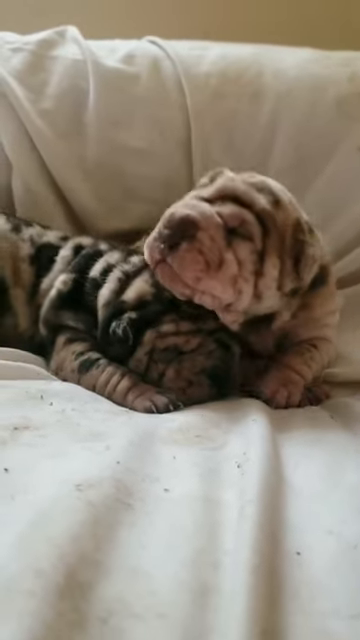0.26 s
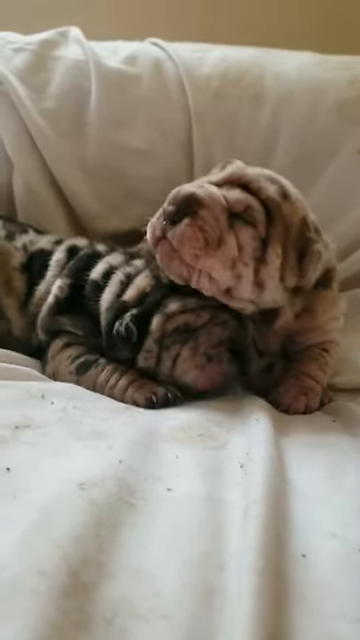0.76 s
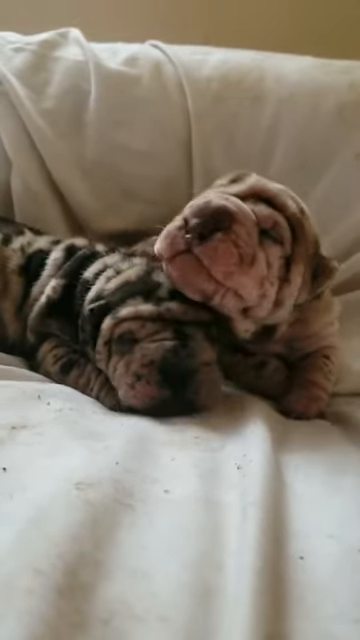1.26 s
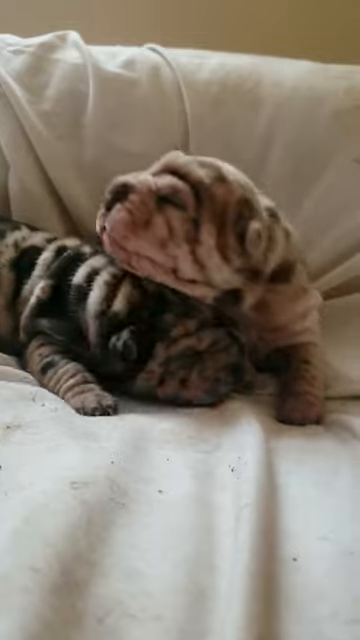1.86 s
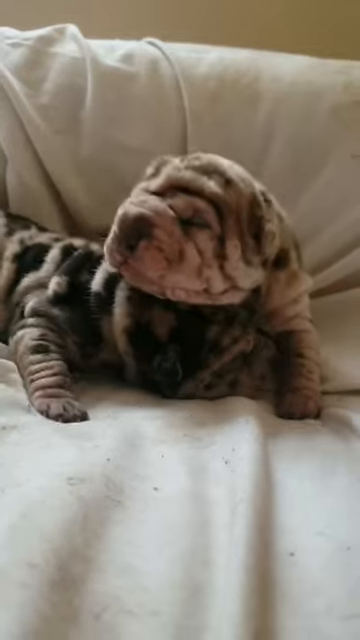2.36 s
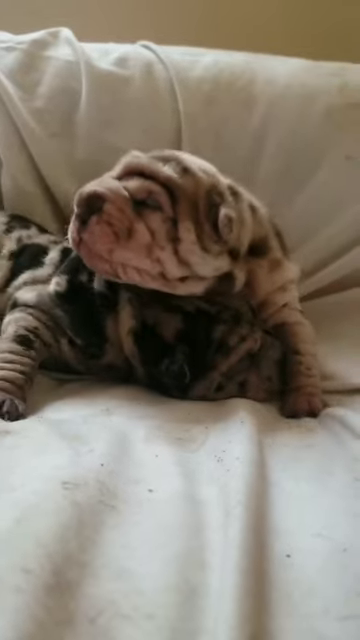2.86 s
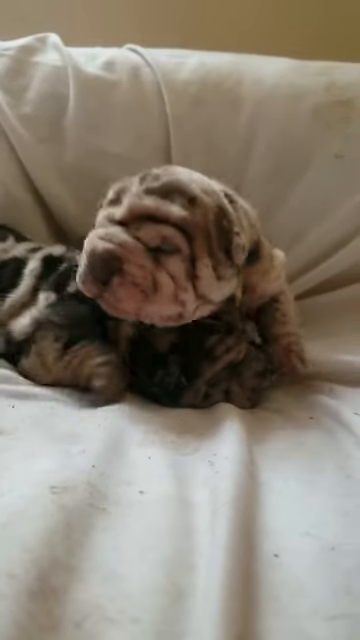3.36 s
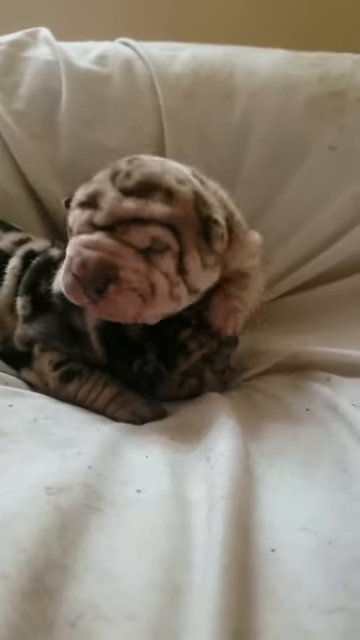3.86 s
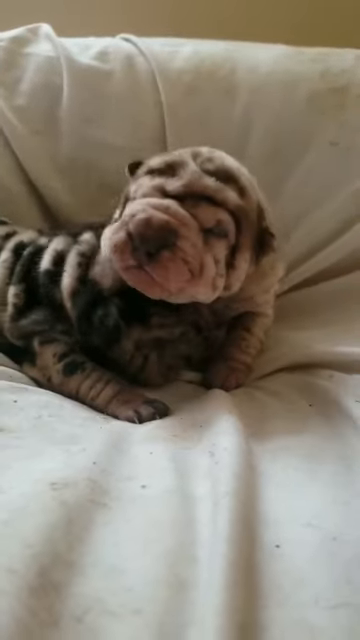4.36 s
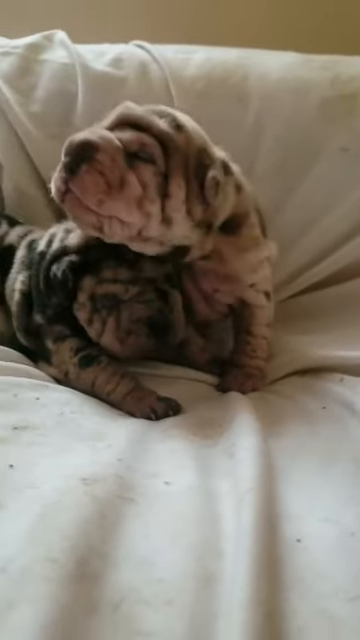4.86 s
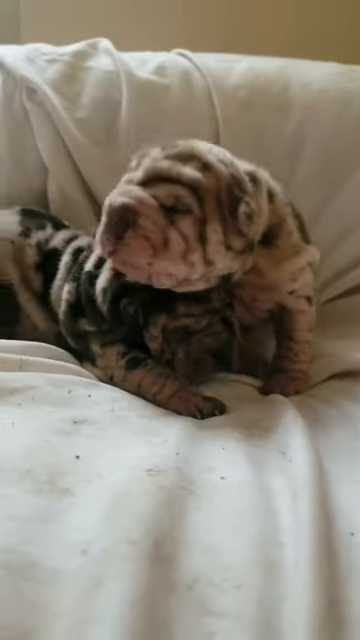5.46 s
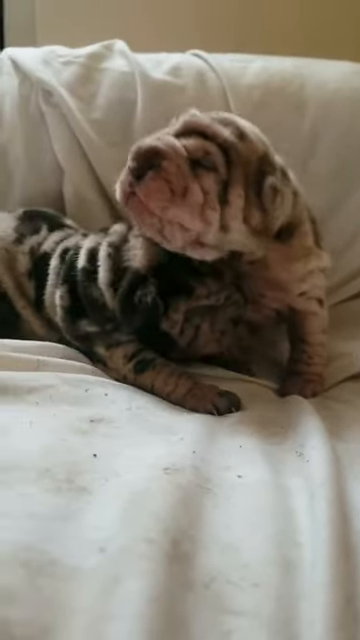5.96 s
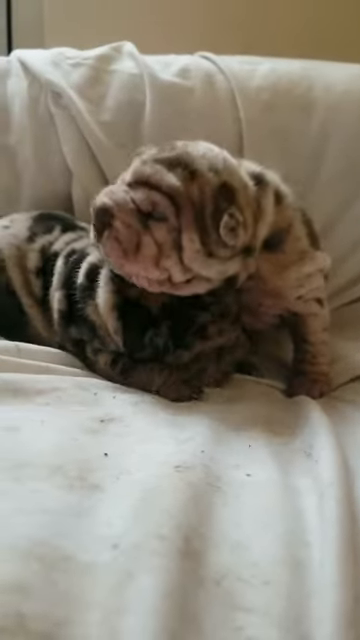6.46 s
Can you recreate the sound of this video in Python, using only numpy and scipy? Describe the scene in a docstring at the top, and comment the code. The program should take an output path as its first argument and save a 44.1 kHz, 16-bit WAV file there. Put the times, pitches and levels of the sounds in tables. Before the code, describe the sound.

Close up in a bare room, a tiny pup gives repeated squeaky yips breaking into low grumbles, between small grunts, faint bumps and cloth rubbing.

```python
"""A very young puppy cries again and again: each cry leaps to a yip, breaks and sinks to a grumble.
Creaky grunts, a whine and a squeak share its voice: pulses of the vocal folds excite the throat,
mouth and muzzle resonances, with hiss added. Two puppies wriggle on a sofa in a bare room: bumps are
damped resonances, cloth and fur rubbing the right port is shaped noise, and room tone lies beneath."""
import sys
import numpy as np
from scipy import signal
from scipy.fft import rfft, irfft, next_fast_len
from scipy.io import wavfile
from scipy.ndimage import uniform_filter1d

SR = 44100
rng = np.random.default_rng(int(sys.argv[2]) if len(sys.argv) > 2 else 0)


def dump_mix(stems):
    """Bounce the given channels to the path in sys.argv[1] as a 16-bit WAV at rate SR."""
    frames = np.atleast_2d(stems).T  # one column per channel
    limited = np.clip(frames, -1, 1)  # hard clip at full scale
    pcm = np.round(limited * 32767).astype(np.int16)
    wavfile.write(sys.argv[1], SR, pcm)


N = 296793
T = np.arange(N) / SR  # time axis in s

# Spectrum of the room tone. Each row: frequency in Hz, relative level in dB per Hz.
HUSH_SPECTRUM = [(25, -19), (70, 0), (130, -5), (300, -29.5), (4000, -33), (12500, -37.5)]
HUSH_DB = -66  # rms before its slow swell

# Reverberation time of the room. Each row: frequency in Hz, time to fall by 60 dB in seconds.
ROOM_DECAY = [(300, 0.69), (12000, 0.34)]
# Tint of the reflections. Each row: frequency in Hz, gain in dB.
ROOM_TINT = [(300, -1), (900, 0.5), (1800, 4.5)]

# Soft bumps of paws and bodies. Each row: start in seconds, envelope peak in dB.
BODY_BUMPS = [(.186, -40.5), (1.002, -40.5), (1.1, -51), (4.298, -48), (4.716, -49.5), (5.362, -42.5)]

# Spectrum of cloth and fur rubbing. Each row: frequency in Hz, relative level in dB per Hz.
RUB_SPECTRUM = [(40, -14.5), (140, 4), (500, -4), (1400, -11.5), (4000, -13), (9500, -19.5), (12500, -17.5)]
# Strokes of cloth and fur. Each row: start in seconds, time of most pressure in seconds,
# end in seconds, peak in dB, level it eases towards in dB.
RUB_STROKES = [(0.344, 0.381, 0.59, -52, -61), (2.695, 2.725, 2.81, -57.5, -106),
               (4.767, 4.916, 5.76, -39, -86), (5.12, 5.26, 5.35, -55, -45),
               (6.193, 6.37, 6.49, -52.5, -76)]
RUB_ATTACK_S, RUB_RELEASE_S, RUB_EASE_S = 0.02, 0.018, 1
RUB_ENTRY_DB, RUB_REST_DB = -10, -74.5  # first touch against the peak; faint stirring throughout

CLAW_S, CLAW_DB = 1.003, -44  # a claw catches on the cover: time in s, noise level at the onset

# Small pops as the throat opens. Each row: start in seconds, envelope peak in dB.
THROAT_POPS = [(.253, -41), (1.18, -54), (2.054, -56), (2.446, -61), (2.478, -52), (3.406, -60),
               (4.297, -55)]

# Path to the right port against the left. Each row: frequency in Hz, lag in seconds, gain in dB.
RIGHT_PORT = [(300, .00017, 1), (1100, .00026, -3), (2600, .00036, -5)]

# Fixed resonances of throat and muzzle. Each row: frequency in Hz, relative gain in dB.
THROAT_RESPONSE = [(30, -42), (130, -3.5), (400, 11.5), (1150, 15.5), (1450, 7.5), (1950, 2), (2330, 2),
                   (2720, -2), (3150, -18.5), (4100, -25), (5700, -42.5), (7200, -19), (9600, -45.5),
                   (12000, -18), (13000, -24.5)]
# Narrow resonances that slide as tongue and jaw move. Each row: centre in Hz, width in Hz, gain in dB.
SLIDING_RESONANCES = [(390, 28, -4), (1931, 43, 6)]
SLIDE, SLIDE_HZ = .08, 9  # rms slide (share of the centre), changes a second
# The main mouth resonance climbs as the jaw drops: Hz at 0 dB of opening, share per dB, width in Hz, dB.
MOUTH_HZ, MOUTH_RISE, MOUTH_WIDTH_HZ, MOUTH_GAIN_DB = 1260, .035, 260, -7.5
HUM_HZ, HUM_SHARE = 660, 0.74  # a closing mouth leaves the nasal hum below Hz; dB lost per dB of closing
JAW_DB, PUSH_DB, RESTLESS_HZ = 1.8, 1, 16  # rms drift of opening and effort, changes a second
QUAVER, QUAVER_HZ = .009, 34.4  # rms quaver (share of pitch), changes a second
START_CYCLES = 4  # the folds need a few cycles to reach full swing
EDGE_FLUTTER_DB, FLUTTER_HZ = 4, 120  # rms flutter of the shrill partials, changes a second
RASP_FADE_S = .04  # extra fade of a fully hoarse ending

# Creaky grunts that swell in, some closing with a flick of pitch; one curve a grunt.
# Each row: time in seconds, pitch in Hz, level in dB, mouth opening in dB.
GRUNT_CURVES = [
    [(2.082, 93.4, -31, -7), (2.11, 119.6, -43, -1), (2.135, 174.2, -42.5, 2), (2.17, 211, -42, 6.5),
     (2.189, 218, -44.5, -10), (2.196, 400, -43.5, -10.5), (2.207, 492, -41, -1.5)],
    [(2.48, 74.6, -45, -6), (2.53, 104.7, -48.5, -6), (2.58, 117, -47, -6.5), (2.617, 125.4, -48, -3),
     (2.622, 393, -45, -15), (2.631, 451, -45.5, -12)],
    [(4.3, 50.3, -43, -10), (4.34, 54.5, -57, -7), (4.375, 118.4, -55.5, -2), (4.393, 222.8, -50, -5),
     (4.422, 209.7, -46, -6), (4.442, 147.1, -46, -3), (4.462, 117.6, -44.5, -4)],
    [(4.725, 52.2, -49, -13), (4.778, 53.37, -58.5, -15), (4.8, 99.6, -54, -12), (4.825, 108.9, -47, -6),
     (4.933, 106.3, -48, -6)],
    [(5.33, 65.5, -56, -5), (5.42, 83.9, -54.5, -9.5), (5.49, 118.3, -49.5, -4), (5.56, 94, -47.5, -6)],
    [(6.555, 77.2, -59, 0), (6.725, 62.2, -58.5, -12)],
]
GRUNT_ROUGHNESS = 0.12  # on a scale of 0 to 1
# Hiss of each grunt. Each entry: level against its voice in dB, before pitch thins it.
GRUNT_HISS = [-15, -31, -17, -35, -10.5, -35]

# A wavering whine that frays out. Each row: time in seconds, pitch in Hz, level in dB,
# mouth opening in dB, roughness from 0 to 1.
WHINE_CURVE = [(0, 569, -26, 9.5, 0.15), (.046, 448.5, -31, 11.5, 0.08), (.082, 523, -35.5, 0, 0.06),
               (.1, 484.3, -36.5, 5.5, 0.35), (.13, 416.4, -37, 5, .45), (.19, 438.6, -36.5, 12, 0.85),
               (.25, 233, -39.5, 5.5, 0.71)]
# One thin squeak, with the same columns: seconds, Hz, dB, dB, roughness from 0 to 1.
SQUEAK_CURVE = [(6.551, 1001, -55, -3, 0.1), (6.585, 950, -52, -3, 0)]
WHINE_HISS_DB, SQUEAK_HISS_DB = -14, -17  # against the voice, before pitch thins it

# Cries that leap to a yip, break and sink to a grumble; one curve a cry. Each row: time in seconds,
# pitch in Hz, level in dB, mouth opening in dB, roughness from 0 to 1.
CRY_CURVES = [
    [(.534, 261.5, -45.5, -8, 0.47), (.562, 720, -31, 11, 0.36), (.582, 858, -35.5, -1, 0),
     (.593, 1031, -23.5, 2.5, 0.02), (.612, 924, -26.5, 11, 0.05), (.639, 911.3, -19, 11.5, 0.02),
     (.656, 483.8, -28.5, 13.5, 0.4), (.685, 411.7, -29.5, 6.5, 0.18), (.702, 313, -35.5, 8, 0.1),
     (.735, 302.6, -36.5, 4, 0), (.757, 223, -38, 5.5, .03), (.81, 214.7, -39, 1, 0.02),
     (.868, 305.3, -38.5, 5.5, 0.08), (.897, 276.3, -39, -4, 0.25)],
    [(1.192, 249.4, -41, -1, 0.9), (1.218, 633.6, -28.5, 11, 0.05), (1.245, 860.4, -31.5, 0, 0.05),
     (1.256, 991, -24.5, 8.5, 0.03), (1.275, 905, -27, 0, 0), (1.293, 887, -24.5, 10, 0.09),
     (1.311, 439.8, -29, 10.5, 0.03), (1.33, 491.5, -28, 4, 0.13), (1.352, 271, -39, -1, 0.65),
     (1.372, 357.2, -33, -1, 0), (1.405, 134.9, -40, -4, 0.42), (1.48, 119.3, -42.5, -4, 0.05),
     (1.55, 99.9, -43.5, -0.5, 0.25), (1.575, 123.9, -45, -4.5, 0.06), (1.7, 145.2, -46, -2, 0.04),
     (1.728, 215.9, -44.5, 6, 0.04), (1.757, 199, -45.5, -5.5, 0.19)],
    [(2.878, 222.5, -46.5, -4.5, 0.68), (2.917, 799, -29, 5.5, 0.11), (2.938, 850, -34, 3, 0.04),
     (2.965, 1002, -25, 4, 0.03), (2.988, 835, -27, 2, 0), (3.005, 827.5, -25.5, 0.5, 0.19),
     (3.022, 451, -34, -2, 0), (3.046, 381.3, -35.5, -2.5, 0.12), (3.075, 198, -46, -3.5, 0.3),
     (3.14, 129.2, -47.5, 1, 0.4)],
    [(3.43, 296, -55, 3, 0.83), (3.457, 625.6, -38.5, -1, 0.14), (3.493, 803, -30.5, 10.5, 0.42),
     (3.522, 658, -37, 0, 0.4), (3.537, 516.3, -31.5, 3, 0.08), (3.57, 315.8, -36, 0, 0),
     (3.61, 196.8, -43, 1, 0.06), (3.65, 160.6, -46.5, -4, 0.02), (3.69, 257.3, -44, 1, 0.18),
     (3.715, 150.8, -43.5, 6, .9), (3.77, 140.4, -43, 6.5, 0.94), (3.855, 125, -41, 12, 0.98),
     (3.91, 139.3, -47, 3.5, 0.86), (3.97, 145.4, -48.5, 5, 0.79), (4.02, 130.4, -54, 11, 0.95)],
    [(5.824, 271.7, -48, 4, 0.76), (5.866, 737, -28, 12.5, 0.24), (5.89, 825.7, -24.5, 14, 0),
     (5.912, 755, -27.5, 8, 0.1), (5.922, 563.3, -26.5, 10.5, 0.1), (5.95, 376.8, -31, 10.5, 0.04),
     (6.005, 245.6, -35, 8, 0.01), (6.07, 183.7, -40, 6.5, 0.08), (6.105, 186, -39, 10.5, 0),
     (6.14, 213, -38.5, 5.5, 0.01), (6.18, 144.9, -46, 1, 0.08), (6.245, 127.4, -44.5, 0, .1)],
]
# Treble of each cry. Each row: hiss in dB, shrill edge in dB, both against the voice
# before pitch weights them.
CRY_TREBLES = [(-15.5, -22.5), (-12, -21.5), (-16, -17.5), (-19, -19.5), (-22, -24)]

EDGE_HZ = 13300  # upper band limit


def amp(db):
    """Level to amplitude: 20 dB is a factor of ten."""
    return 10 ** (np.asarray(db) / 20)


def evened(x):
    """Normalization by mean power: scales to rms 1."""
    return x / np.sqrt(np.mean(x ** 2) + 1e-20)


def blend(a, b, share):
    """Linear interpolation: a at share 0, b at share 1."""
    return a + (b - a) * share


def read(points, hz):
    """Interpolation of a spectrum along a log-frequency axis."""
    point_hz, value = np.transpose(points)
    return np.interp(np.log(hz + 1), np.log(point_hz + 1), value)


def add(mix, s, sound):
    """Superposition: mixes a sound in at time s."""
    part = mix[max(round(s * SR), 0):][:len(sound)]
    part += sound[:len(part)]


def below(x, hz):
    """Zero-phase low-pass filtering: the part of x under hz."""
    return signal.sosfiltfilt(signal.butter(6, hz, fs=SR, output="sos"), x)


def noise(colour, n=N):
    """Spectral shaping: white noise weighted by the given spectrum."""
    size = next_fast_len(n, True)
    white = rfft(rng.standard_normal(size))
    gain = amp(read(colour, np.fft.rfftfreq(size, 1 / SR)))
    return evened(irfft(white * gain, size))[:n]


def wander(n, hz):
    """Low-passed chance: a smooth drift of rms 1 that changes about hz times a second."""
    size = next_fast_len(max(n, SR), True)
    white = rfft(rng.standard_normal(size))
    drift = white / (1 + (np.fft.rfftfreq(size, 1 / SR) / hz) ** 2)
    return evened(irfft(drift, size))[:n]


def steady(x, size=1300):
    """Short-time power normalization: loudness stays at 1 while single pulses keep their shape."""
    window = np.hanning(size)
    energy = signal.convolve(x ** 2, window, "same")
    weight = signal.convolve(np.ones(len(x)), window, "same")
    return x / np.sqrt(abs(energy / weight) + 1e-12)


def hush(swell_db=5.0):
    """Partial coherence: low, restless room tone, partly shared by the two ports."""
    shared = noise(HUSH_SPECTRUM)
    level = amp(HUSH_DB + swell_db * wander(N, 3.2))
    return level * evened(np.array([shared + noise(HUSH_SPECTRUM), shared + noise(HUSH_SPECTRUM)]))


def room(x, first_s=0.001, early_db=7, early_s=0.012, shared_hz=600):
    """Reverberation: dense reflections, strongest from the near walls, each band dying at its own speed."""
    t = T[:SR]
    taps = rng.standard_normal((2, SR)) * (t > first_s) * amp(early_db * np.exp(-t / early_s))
    taps[1] += below(taps[0] - taps[1], shared_hz)  # long waves reach both ports alike
    hz, age, bands = signal.stft(taps, SR, nperseg=256)
    tint_db = read(ROOM_TINT, hz)[:, None]
    decay_db = 60 * age / read(ROOM_DECAY, hz)[:, None]
    tail = signal.istft(bands * amp(tint_db - decay_db), SR, nperseg=256)[1]
    return signal.fftconvolve(x[None], tail / np.linalg.norm(tail[0]), axes=1)[:, :N]


def knocks(rows, hz, length_s):
    """Impulse excitation: each push rings one well damped resonance, tuned slightly by chance."""
    out, t = np.zeros(N), T[:SR // 10]
    envelope = t / length_s * np.exp(1 - t / length_s)  # peaks at 1 after length_s
    tunings = 1 + 0.29 * rng.standard_normal(len(rows))
    for (s, db), tuning in zip(rows, tunings):
        add(out, s, amp(db) * envelope * np.sin(2 * np.pi * hz * tuning * t))
    return out


def stroke(start, peak_at, end, peak_db, eased_db):
    """Friction grows with pressure: one rub touches, presses harder, eases off and lifts."""
    pressing_db = np.interp(T, [start, peak_at], [RUB_ENTRY_DB, 0])
    easing_db = blend(eased_db, peak_db, np.exp(-np.maximum(T - peak_at, 0) / RUB_EASE_S))
    touch = np.clip((T - start) / RUB_ATTACK_S, 0, 1)
    lift = np.exp(-np.maximum(T - end, 0) / RUB_RELEASE_S)
    return amp(pressing_db + easing_db) * touch * lift


def rubbing(grain_db=1.1, leak_db=-21):
    """Friction noise: uneven rubbing right at the right port; the left hears only a little."""
    pressure = amp(RUB_REST_DB) + sum(stroke(*row) for row in RUB_STROKES)
    level = pressure * amp(grain_db * wander(N, 24))
    return level * np.array([amp(leak_db) * noise(RUB_SPECTRUM), noise(RUB_SPECTRUM)])


def claw(length_s=.003):
    """Broadband transient: one short, bright scratch of decaying noise."""
    return amp(CLAW_DB) * (T > CLAW_S) * np.exp(-abs(T - CLAW_S) / length_s) * rng.standard_normal(N)


def far_port(x):
    """Diffraction: sound bends round to the right port, its treble weakened, with a lag for each frequency."""
    port, hz = np.array(RIGHT_PORT), np.fft.rfftfreq(2 * N, 1 / SR)
    lag_s, shade_db = read(port[:, [0, 1]], hz), read(port[:, [0, 2]], hz)
    return irfft(rfft(x, 2 * N) * amp(shade_db) * np.exp(-2j * np.pi * hz * lag_s))[:N]


def folds(hz, rough, jitter=.13, shimmer=.45, doubling=.8, limp=.17, breathy=.72, waver=.007, creak_hz=130):
    """Self-oscillation: one sharp pulse a cycle; strain makes cycles alternate, then turn uneven and noisy."""
    n = len(hz)
    slack = 1 / (1 + (hz / creak_hz) ** 4)  # slack folds creak unevenly
    unsteady = waver + jitter * (rough ** 2 + .2 * slack)
    turns = np.cumsum(hz * np.exp(unsteady * wander(n, 204))) / SR
    turns = turns + limp * rough * np.cos(np.pi * turns)  # long and short cycles alternate
    cycle = np.round(turns).astype(int)
    uneven = shimmer * (rough + .12 * slack)
    chance_size = np.exp(uneven * rng.standard_normal(SR)[cycle])
    size = chance_size * (1 + doubling * rough * (-1) ** cycle)  # strong and weak cycles alternate
    pulses = -np.sinc((turns - cycle) * SR / hz / 2) * size
    puffs = np.exp(-2 * (turns % 1)) * rng.standard_normal(n)  # noise that fades within each cycle
    share = breathy * rough ** 1.5
    return (1 - share) * steady(pulses) + share * steady(puffs)


def ring(x, gain_db, size=2048, snap=.45):
    """Convolution: pulses build up briefly, snap and ring on in gain_db(Hz); snap 1 has no build-up."""
    log_gain = np.log(amp(gain_db(abs(np.fft.fftfreq(size, 1 / SR)))))
    phase = snap * signal.hilbert(log_gain).imag  # snap 1 is minimum phase
    response = np.fft.ifft(np.exp(log_gain - 1j * phase)).real
    return signal.fftconvolve(x, np.fft.fftshift(response), "same")


def resonate(x, hz, width):
    """Heterodyning: a one-pole filter in a turning frame gives a unit-gain resonance along the curve hz."""
    turn = np.exp(2j * np.pi * np.cumsum(hz) / SR)
    r = np.exp(-np.pi * width / SR)
    return 2 * (turn * signal.lfilter([1 - r], [1, -r], x / turn)).real


def vocal_tract(flow, mouth_db, nose_hz=1400, lips_hz=2150, gape=0.52, open_db=8.0):
    """Source-filter principle: as the mouth opens, the upper resonances take over from the lower."""
    n = len(flow)
    tone = ring(flow, lambda f: read(THROAT_RESPONSE, f))
    for centre_hz, width, db in SLIDING_RESONANCES:
        slide_hz = centre_hz * np.exp(SLIDE * wander(n, SLIDE_HZ))
        tone = tone + amp(db) * resonate(tone, slide_hz, width)
    mouth_hz = MOUTH_HZ * np.exp(MOUTH_RISE * np.maximum(mouth_db, -6))
    tone = tone + amp(MOUTH_GAIN_DB) * resonate(tone, mouth_hz, MOUTH_WIDTH_HZ)
    low, top = below(tone, nose_hz), tone - below(tone, lips_hz)
    middle = tone - low - top
    # with the mouth nearly shut the sound leaves by the nose and the middle resonance sinks
    upper = top + amp(gape * np.minimum(mouth_db - open_db, 0)) * middle
    hum = below(low, HUM_HZ)
    low = hum + amp(HUM_SHARE * np.minimum(mouth_db, 0)) * (low - hum)
    return steady(steady(low) + amp(mouth_db) * steady(upper))


def voice(t, hz, level_db, mouth_db, rough, hiss_db, edge_db, release_s=0.025, hiss_rise_s=0.065, shrill_hz=950):
    """Phonation: the folds drive the vocal tract, with shrill partials and turbulent air on top."""
    n, age = len(t), t - t[0]
    hz = uniform_filter1d(hz, size=350, mode="nearest")  # muscles round off every turn of pitch
    mouth_db = mouth_db + JAW_DB * wander(n, RESTLESS_HZ)
    level_db = level_db + PUSH_DB * wander(n, RESTLESS_HZ)
    flow = folds(hz, np.clip(rough, 0, 1))
    tone = vocal_tract(flow, mouth_db)
    # tight folds snap shut harder and put shrill, fluttering partials on the yip
    shrill = steady(below(flow - below(flow, 2490), 4910))
    edge = amp(edge_db + EDGE_FLUTTER_DB * wander(n, FLUTTER_HZ)) * (hz / shrill_hz) ** 2
    tone = tone + edge * shrill
    # air hisses in the narrow muzzle once the flow has built up; tight folds let less through
    air = noise(THROAT_RESPONSE, SR)[:n]
    air = evened(air - below(air, 3400)) * amp(hiss_db)
    air = air * np.tanh(age / hiss_rise_s) / (1 + (hz / shrill_hz) ** 4)
    fade_s = release_s + RASP_FADE_S * rough[-1] ** 2  # a hoarse ending trails off
    ramp = np.minimum(age * hz[0] / START_CYCLES, (t[-1] - t) / fade_s)
    edges = np.sin(np.pi / 2 * np.clip(ramp, 0, 1)) ** 2
    return t[0], amp(level_db) * edges * (tone + air)


def call(rows, hiss_db, edge_db=-26, overhang_s=0.019):
    """Continuous articulation: pitch, level, mouth and roughness glide from point to point."""
    s, hz, *others = np.transpose(rows)
    t = np.arange(s[0], s[-1] + overhang_s, 1 / SR)  # leaves room for the release
    hz = np.exp(np.interp(t, s, np.log(hz)) + QUAVER * wander(len(t), QUAVER_HZ))
    return voice(t, hz, *(np.interp(t, s, curve) for curve in others), hiss_db, edge_db)


def grunts():
    """Creaky phonation at low pitch, with one roughness throughout."""
    return [call([(*row, GRUNT_ROUGHNESS) for row in rows], hiss_db)
            for rows, hiss_db in zip(GRUNT_CURVES, GRUNT_HISS)]


def cries():
    """Register breaks: the pitch leaps to a yip and falls into a grumble."""
    return [call(rows, *treble) for rows, treble in zip(CRY_CURVES, CRY_TREBLES)]


def scene(direct_db=0, wet_db=-9):
    """Superposition of direct and reflected sound: the puppy lies nearer the left port."""
    puppy = knocks(THROAT_POPS, hz=774, length_s=0.0015) + claw()
    whine, squeak = call(WHINE_CURVE, WHINE_HISS_DB), call(SQUEAK_CURVE, SQUEAK_HISS_DB)
    for sound in cries() + grunts() + [whine, squeak]:
        add(puppy, *sound)
    direct = amp(direct_db) * np.array([puppy, far_port(puppy)])
    reflected = amp(wet_db) * room(puppy)
    bumps = knocks(BODY_BUMPS, hz=138.0, length_s=0.0025)
    return direct + reflected + bumps + rubbing() + hush()


def record(dry):
    """Band limitation: a linear-phase low-pass removes the highest treble."""
    low_pass = signal.firwin(511, EDGE_HZ, window=("kaiser", 9), fs=SR)
    return signal.oaconvolve(dry, low_pass[None], "same")


dry = scene()
out = record(dry)
dump_mix(out)
```